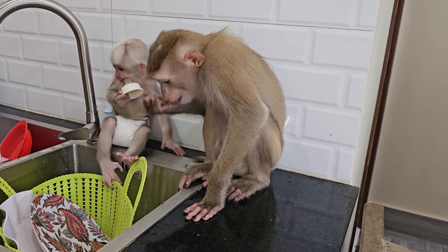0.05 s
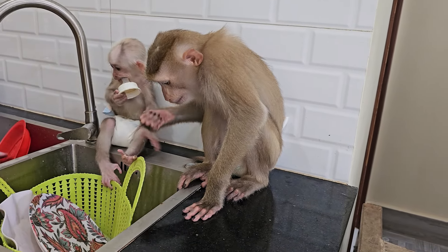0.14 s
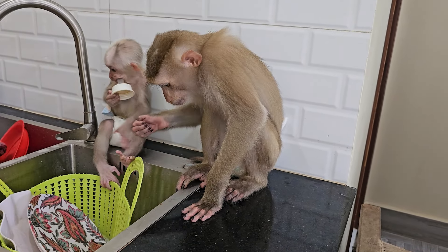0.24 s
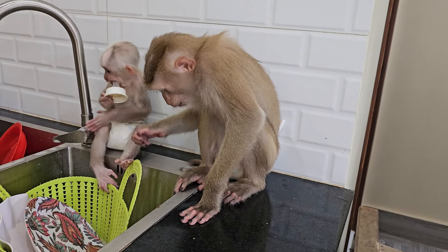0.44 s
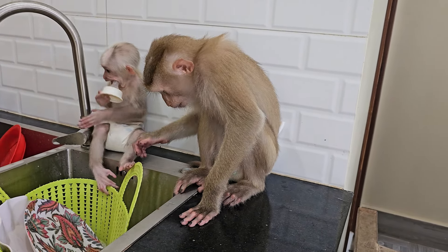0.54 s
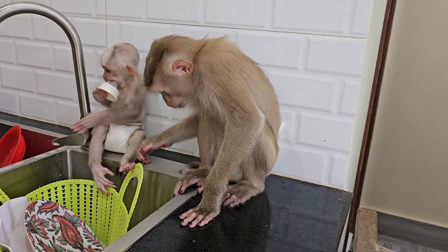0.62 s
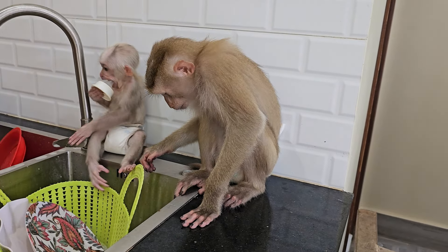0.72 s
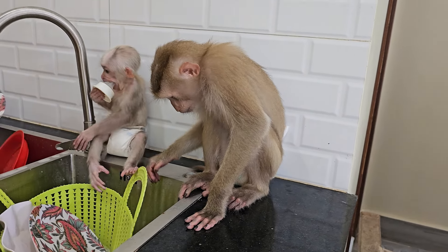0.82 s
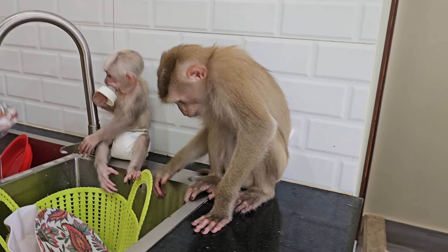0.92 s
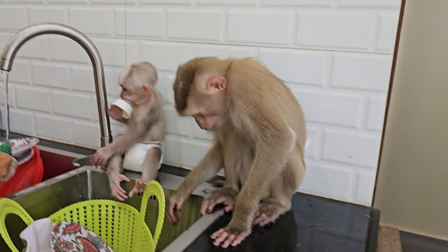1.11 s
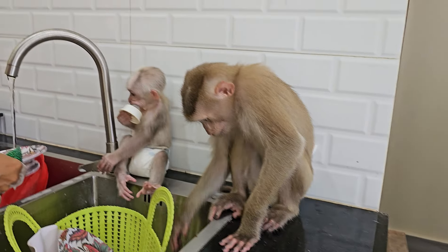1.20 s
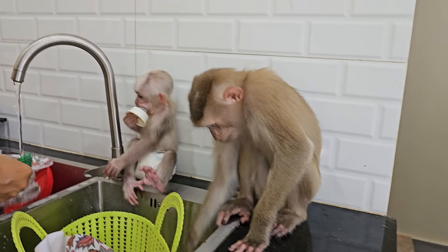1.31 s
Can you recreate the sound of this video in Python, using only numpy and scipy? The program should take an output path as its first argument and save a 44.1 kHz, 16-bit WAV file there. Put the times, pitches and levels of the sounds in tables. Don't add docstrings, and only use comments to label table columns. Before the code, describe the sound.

Crockery clatters in a steel sink: a few sharp clinks, a bright tick, then a denser, louder crash with dull basin booms, fading into tile echo over a thin tap trickle; close hand-held stereo microphone, sink to the right.

```python
import sys
import numpy as np
from scipy import signal
from scipy.fft import rfft, irfft, next_fast_len
from scipy.io import wavfile
from scipy.ndimage import uniform_filter1d, map_coordinates

SR = 44100
rng = np.random.default_rng(int(sys.argv[2]) if len(sys.argv) > 2 else 0)


def master_out(mix):
    frames = np.transpose(np.atleast_2d(mix))
    ceiling = np.clip(frames, -1, 1)
    pcm = np.round(ceiling * 32767).astype(np.int16)
    wavfile.write(sys.argv[1], SR, pcm)


def ratio(d):
    e = np.asarray(d, float) / 20
    return 10 ** e


N = 59535
PIVOT_HZ = 4000

# (f/Hz, level/dB)
LEFT_ROOM = [(100, -1.5), (1000, 1.5), (3000, -4), (6000, -8.5), (14000, -3.5)]


def unit(x):
    return x / np.sqrt(np.mean(x ** 2) + 1e-20)


def along(points, hz):
    f, v = np.transpose(points)
    return np.interp(np.log(hz + 1), np.log(f + 1), v)


def filtered(x, response):
    n = x.shape[-1]
    m = next_fast_len(n + 8192)
    return irfft(rfft(x, m) * response(np.fft.rfftfreq(m, 1 / SR)), m)[..., :n]


def tilt(hz, db_per_octave):
    return db_per_octave * np.log2((hz + 100) / PIVOT_HZ)


def pair(a, alike):
    def mid_and_side(hz):
        turn = np.arccos(np.clip(along(alike, hz), -1, 1)) / 2
        return np.array([np.cos(turn), np.sin(turn)])

    mid, side = filtered(a, mid_and_side)
    return np.array([mid + side, mid - side])


def ring(modes, rise_s, lift_db=0, spread=1):
    scatter_db, detune = 3.5, 0.0069
    t = np.arange(SR // 2) / SR
    hz, db, t60 = np.transpose(modes)[:, :, None]
    strength, pitch, phase = spread * rng.standard_normal((3, len(modes), 1))
    level = ratio(db + lift_db + scatter_db * strength - 60 * t / t60)
    waves = level * np.sin(2 * np.pi * hz * (1 + detune * pitch) * t + 1.14 * phase)
    return waves.sum(0) * (1 - np.exp(-t / rise_s))


def add(track, s, x):
    i = round(s * SR)
    track[i:i + len(x)] += x


def kitchen(x):
    # (f/Hz, t60/s)
    room_decay = [(130, 0.31), (300, 0.89), (800, 0.79), (3000, 0.81), (7000, 0.68), (14000, 0.47)]
    # (f/Hz, level/dB)
    wet = [(100, 2), (800, 0.5), (3000, -0.5), (14000, 0.5)]
    # (f/Hz, likeness)
    room_alike = [(60, 0.41), (150, 0.97), (330, 0.7), (1000, -0.13), (8000, -0.071)]
    first_wall_s = 0.004
    block, out = SR // 10, np.zeros((2, N + 2 * SR))
    for i in range(0, N, block):
        hz, t, z = signal.stft(rng.standard_normal((2, SR)), SR, nperseg=256)
        z = z * ratio(-60 * t / along(room_decay, hz)[:, None])
        tail = signal.istft(z, SR, nperseg=256)[1][:, :SR]
        j = i + round(first_wall_s * SR)
        y = signal.fftconvolve(x[None, i:i + block], tail / np.linalg.norm(tail[0]), axes=1)
        out[:, j:j + y.shape[1]] += y
    both = pair(out[:, :N], room_alike)
    return filtered(both, lambda hz: ratio(along(wet, hz) + [along(LEFT_ROOM, hz), 0 * hz]))


def trickle():
    # (f/Hz, level/dB per Hz)
    water_colour = [(60, -0.5), (100, -1.5), (180, -10), (400, -17.5), (1500, -18.5), (3000, -21.5),
                    (7000, -30), (12500, -42.5), (15000, -43)]
    # (f/Hz, likeness)
    water_alike = [(60, 1), (300, 0.69), (1500, 0.042), (8000, 0.092)]
    start_db, fade_db, calm_hz = -39.5, -3.5, 700
    z = signal.stft(rng.standard_normal((2, N)), nperseg=512)[2]
    patches = uniform_filter1d(rng.standard_normal(z.shape[1:]), size=6, axis=0)
    patches = unit(uniform_filter1d(patches, size=8, axis=1))
    patchiness = np.clip(np.fft.rfftfreq(512, 1 / SR) / calm_hz, 0, 1)[:, None]
    noise = signal.istft(z * ratio(2.6 * patches * patchiness), nperseg=512)[1][:, :N]
    both = pair(filtered(noise, lambda hz: ratio(along(water_colour, hz))), water_alike)
    both = filtered(both, lambda hz: ratio([0.73 * along(LEFT_ROOM, hz), -0.4 * along(LEFT_ROOM, hz)]))
    return ratio(start_db + fade_db * np.arange(N) / N) * unit(both)


def grip():
    # (t/s, level/dB)
    hand_level = [
        (0, -64),
        (.64, -83),
        (.675, -34.5),
        (.875, -34.5),
        (0.901, -55),
        (1.24, -68),
        (1.279, -42),
        (1.35, -53),
    ]
    # (f/Hz, level/dB per Hz)
    hand_colour = [(12, -120), (22, -16), (40, -6.5), (70, -10), (130, -19.5), (400, -120)]
    s, db = np.transpose(hand_level)
    low = unit(filtered(rng.standard_normal(N), lambda hz: ratio(along(hand_colour, hz))))
    return ratio(np.interp(np.arange(N) / SR, s, db)) * low * ratio([[5], [-12]])


def basin():
    # (t/s, level/dB, upper modes over the lowest/dB)
    thumps = [(.04, -40, -29), (.095, -35.5, 5.5), (.145, -43.5, 9), (.26, -43, -8), (.345, -43, 16.5),
              (.41, -32, 8), (.47, -40, 3.5), (.648, -24.5, -16), (.684, -21, -10), (.768, -28.5, 6.5),
              (.845, -31.5, -15)]
    # (f/Hz, level/dB, t60/s)
    basin_modes = [(52.7, -36, .2), (82.36, 0.5, 0.51), (157, -3.5, 0.23), (207, -4, 0.11), (252, -8, 0.24),
                   (340, -36, 0.028), (407, -31, 0.081)]
    out = np.zeros(N + SR)
    upper = np.transpose(basin_modes)[0][:, None] > 120
    for s, db, lift_db in thumps:
        boom = ring(basin_modes, rise_s=0.0024, lift_db=lift_db * upper, spread=0.39)
        add(out, s, ratio(db - 3.5) * boom)
    return out[:N]


def bowl():
    # (t/s, level/dB, upper modes over the lower/dB)
    knocks = [
        (.42, -32.5, -3),
        (.644, -14.5, -21),
        (.658, -20.5, -20),
        (.70, -16, 1),
        (.735, -28.5, 3.5),
        (.78, -25, 7),
        (.81, -29, 9.5),
        (.85, -37, 6),
        (.935, -36, 2),
    ]
    # (f/Hz, level/dB, t60/s)
    bowl_modes = [(562, -7.5, 0.17), (682.4, -9.5, 0.18), (752, 3, 0.097), (790, 2.5, 0.097),
                  (860, -16, 0.013), (896, -3, 0.14), (938, -3, 0.064), (939.6, -2, 0.11)]
    out = np.zeros(N + SR)
    upper = np.transpose(bowl_modes)[0][:, None] > 900
    for s, db, lift_db in knocks:
        add(out, s, ratio(db - 6.5) * ring(bowl_modes, rise_s=0.0013, lift_db=lift_db * upper))
    return out[:N]


def cup():
    # (t/s, level/dB)
    taps = [
        (.345, -28.5),
        (.362, -23),
        (.415, -29.5),
        (.479, -27),
        (.56, -36),
        (.58, -37.5),
        (.655, -35),
        (.78, -29),
        (.89, -35),
    ]
    # (f/Hz, level/dB, t60/s)
    cup_modes = [(574, -14, 0.1), (672, -16, 0.15), (921, -6, 0.064), (992, 3.5, 0.2), (1386, -20, 0.18),
                 (1580, -26, 0.037)]
    out = np.zeros(N + SR)
    for s, db in taps:
        add(out, s, ratio(db) * ring(cup_modes, rise_s=0.0013, spread=0.58))
    return out[:N]


def snap():
    start_s, level_db, centre_hz, t60 = 0.5442, -9, 14940, 0.013
    out, t = np.zeros(N), np.arange(SR // 20) / SR
    noise = rng.standard_normal(len(t))
    tick = unit(filtered(noise, lambda hz: np.exp(-((hz - centre_hz) / 1200) ** 2)))
    add(out, start_s, ratio(level_db - 60 * t / t60) * tick)
    return out


def clinks():
    # (t/s, f/Hz, level/dB, t60/s)
    struck_notes = [(.088, 280, -39.5, 0.1), (.123, 1810, -32, 0.061), (0.23, 2850, -24, 0.041),
                    (.248, 533, -29, 0.21), (.263, 3040, -34, 0.039), (0.26, 4670, -29, .05),
                    (.268, 4850, -22, 0.073), (0.211, 5400, -20, 0.036), (.333, 520, -28.5, 0.057),
                    (.336, 2860, -15, 0.062), (0.349, 1462, -22, 0.14), (.362, 4490, -17, 0.035),
                    (.372, 5280, -18, 0.086), (.362, 2700, -16, .1), (0.367, 2920, -20, 0.03),
                    (0.404, 2700, -22, .06), (.425, 2826, -21, 0.066), (0.546, 3250, -36, .03),
                    (.545, 2850, -30, 0.024), (.548, 2097, -8, 0.02), (.562, 1630, -18, 0.044),
                    (.575, 2840, -21, 0.091), (0.629, 2730, -14.5, 0.13), (.63, 4440, -10.5, 0.03),
                    (.63, 6370, -15, 0.078), (0.638, 2730, -10, 0.049), (.643, 765, -9.5, 0.048),
                    (.67, 800, -15.5, 0.089), (0.648, 4750, -13.5, 0.04), (0.653, 2780, -9.5, 0.16),
                    (.652, 2843, -12.5, 0.15), (.636, 965, -22, 0.17), (.667, 892.5, -15, 0.065),
                    (0.681, 5550, -12, .05), (.683, 4760, -11, 0.035), (.684, 790, -15.5, 0.14),
                    (0.698, 2880, -19, 0.033), (.71, 3070, -15, 0.031), (.735, 820, -23, 0.04),
                    (0.745, 2900, -9, 0.03), (0.753, 3000, -23, 0.029), (.76, 3660, -26.5, 0.45),
                    (.692, 4750, -22, 0.032), (0.767, 4590, -18, 0.041), (0.774, 3040, -25, 0.03),
                    (.775, 934, -19, 0.23), (.793, 2840, -20, 0.035), (0.808, 2860, -14.5, 0.046),
                    (0.789, 5450, -24, .1), (.88, 792, -31, .08), (1.265, 3250, -34, .04),
                    (1.263, 4700, -40, .03)]
    # (t/s, f/Hz, level/dB, t60/s)
    basin_notes = [
        (0.77, 79, -19, 0.17),
        (.655, 201, -27, 0.12),
        (.77, 155, -9.5, 0.19),
        (0.83, 157, -20, 0.35),
        (0.88, 160, -23, 0.13),
        (0.42, 390, -34.5, 0.074),
        (1.24, 264, -44.5, .15),
    ]
    swell_cycles = 0.48
    out, t = np.zeros(N + SR), np.arange(SR // 3) / SR
    for s, hz, db, t60 in struck_notes + basin_notes:
        swell = 1 - np.exp(-t * hz / swell_cycles)
        add(out, s, ratio(db - 60 * t / t60) * np.sin(2 * np.pi * hz * t) * swell)
    return out[:N]


def scrapes():
    # (start t/s, length/s, level/dB, brightness/dB per octave)
    grating = [(.126, 0.11, -41, -4.5), (.21, 0.042, -30, 2.5), (.228, 0.025, -31, -4.5),
               (.242, 0.017, -26, -3.5), (.257, 0.033, -21, -1.5), (.335, 0.032, -22, 2.5),
               (.35, 0.051, -21, -2.5), (.395, 0.044, -27.5, -4.5), (.546, 0.055, -23, -2),
               (.63, 0.047, -17.5, -0.5), (.678, 0.024, -16, -2.5), (.705, 0.045, -27.5, -5),
               (.77, 0.044, -24.5, -1.5), (1.04, 0.068, -44, -2.5), (1.264, 0.0083, -49.5, -1.5)]
    # (f/Hz, width/Hz, level/dB)
    resonances = [(598, 1160, -18.5), (1490, 440, -11), (2940, 412, -1), (4610, 600, -2), (5530, 1060, -4),
                  (7630, 1100, -7.5), (11280, 2100, -14.5), (15200, 770, -19.5)]
    slips_per_s, rough_db = 445.5, 2.5
    out, u = np.zeros(N + SR), np.arange(SR // 8) / SR

    def body(f):
        total = 0
        for j, (centre, width, db) in enumerate(resonances):
            band = 1j * f * width / (centre * centre - f * f + 1j * f * width)
            total = total + (-1) ** j * ratio(db) * band
        return total

    for s, length, db, tilt_db in grating:
        slips = ratio(rough_db * map_coordinates(rng.standard_normal(200), [u * slips_per_s]))
        rub = rng.standard_normal(len(u)) * slips
        swell = np.sin(np.pi * np.clip(u / length, 0, 1) ** 0.63)
        add(out, s, ratio(db + 3.5) * swell * unit(filtered(rub, lambda f: ratio(tilt(f, tilt_db)) * body(f))))
    return out[:N]


def crockery():
    # (t/s, crack level/dB, plate ring over the crack/dB, brightness/dB per octave)
    contacts = [(.1245, -29.5, -4, -4.5), (.149, -30, -1, -3), (.2025, -15, -14, -2.5),
                (.2126, -9, -24, -1.5), (.2625, -11, -29, 0.5), (.279, -15, -18, -5.5),
                (.3345, -6.5, -6.5, -3), (.353, -20, 0, -5.5), (.368, -10.5, -3, -2.5),
                (.4043, -12, -5, -6), (.508, -12, -29, 2), (.5439, 0.5, -38, -1), (.63, -7.5, -2.5, 5.5),
                (.6448, -15, 3, -6), (.6543, -7.5, -16, -3.5), (.6803, -6, -28, 1.5), (.6936, -9, -30, -2),
                (.7435, -10.5, -12, -2.5), (.7744, -15.5, -4, 13), (.80, -20, -27, -7)]
    # (f/Hz, level/dB, t60/s)
    plate_modes = [(1673, 1, 0.056), (2090, -5, 0.063), (2700, -10, 0.048), (2470, -19, 0.034),
                   (2850, 0, 0.084), (3067, 8, 0.022), (3000, 2, 0.057), (4300, -21, 0.025),
                   (4780, -30, 0.094), (5600, -25, 0.018), (6400, -10, 0.013)]
    # (f/Hz, level/dB per Hz)
    crack_colour = [(100, -40), (500, -15.5), (1300, -9), (2800, -8.5), (5000, -4), (11500, -9),
                    (13000, -19), (15000, -31)]
    crack_t60, rise_s = 0.026, 0.001
    out, t = np.zeros(N + SR), np.arange(SR // 8) / SR
    shape = ratio(-60 * t / crack_t60) * (1 - np.exp(-t / rise_s))
    for s, db, ring_db, tilt_db in contacts:
        noise = rng.standard_normal(len(t))
        crack = unit(filtered(noise, lambda hz: ratio(along(crack_colour, hz) + tilt(hz, tilt_db))))
        add(out, s, ratio(db - 4) * shape * crack)
        add(out, s, ratio(db + ring_db - 11) * ring(plate_modes, rise_s=0.00034))
    return out[:N]


def scene():
    # (f/Hz, level/dB)
    left_direct = [(100, 3.5), (600, -2.5), (2000, -4.5), (5000, -76), (9000, -41), (14000, -6)]
    left_lag_s, low_cut_hz = 0.00019, 43.3
    sink = crockery() + bowl() + basin() + scrapes()
    held, tick, notes = cup(), snap(), clinks()

    def to_ports(hz):
        left = ratio(along(left_direct, hz)) * np.exp(-2j * np.pi * hz * left_lag_s)
        return np.array([left, 1 + 0 * hz])

    direct = filtered(sink + held + tick + notes, to_ports)
    room = kitchen(sink + ratio(-5) * tick + ratio(-10) * notes + ratio(-6) * held)
    air = filtered(direct + room + trickle(), lambda hz: (1j * hz / (low_cut_hz + 1j * hz)) ** 5)
    return air + grip()


def top_cut(x):
    return signal.sosfilt(signal.butter(12, 16640, fs=SR, output="sos"), x)


def record(dry):
    top_hz, top_width_hz = 15500, 110
    mix = dry / (1 + np.abs(dry) ** 6) ** (1 / 6)

    def band_limit(hz):
        return ratio(-26 / (1 + np.exp(np.clip((top_hz - hz) / top_width_hz, -50, 50))))

    return top_cut(filtered(mix, band_limit))


dry = scene()
out = record(dry)
master_out(out)
```